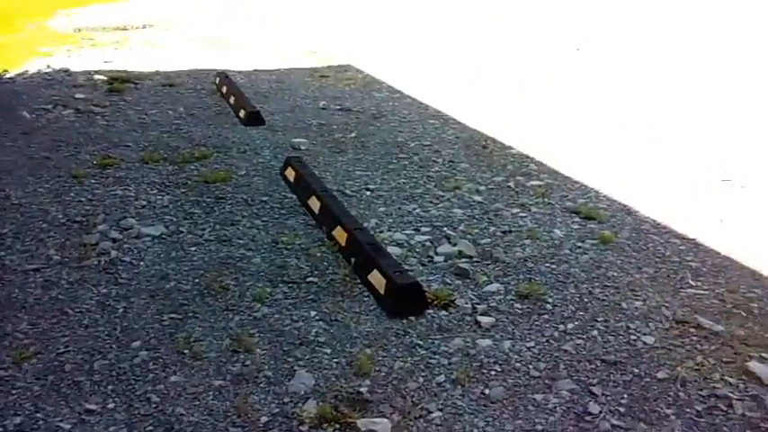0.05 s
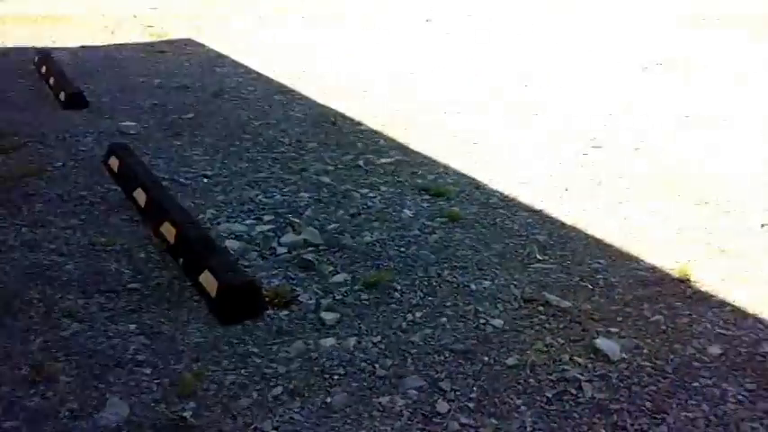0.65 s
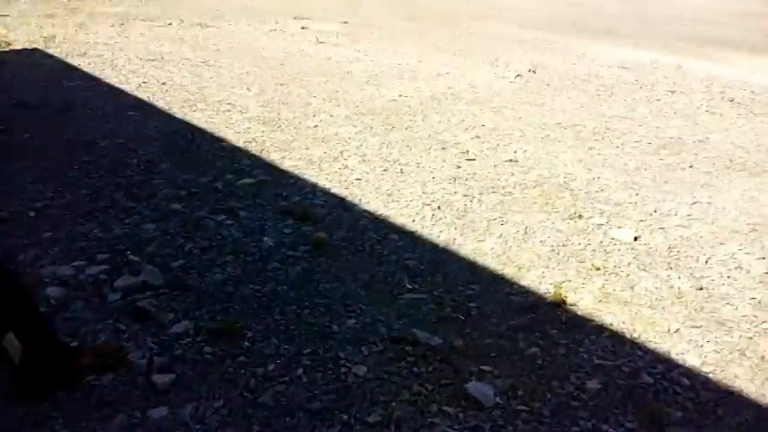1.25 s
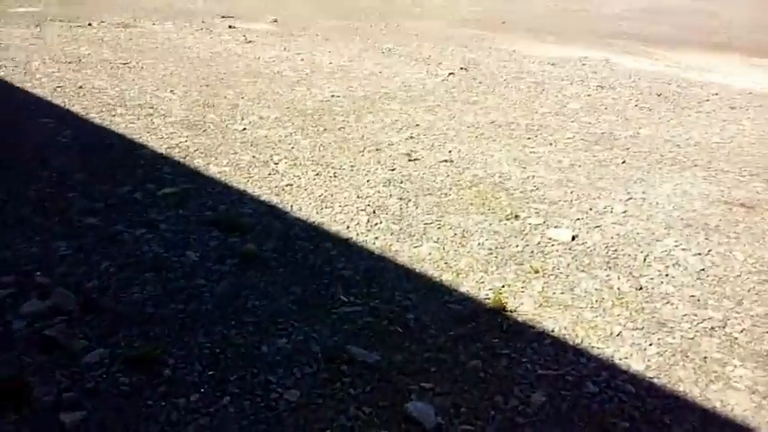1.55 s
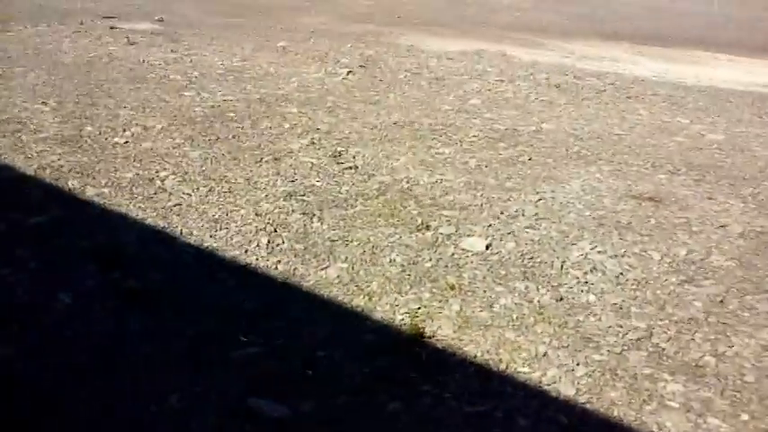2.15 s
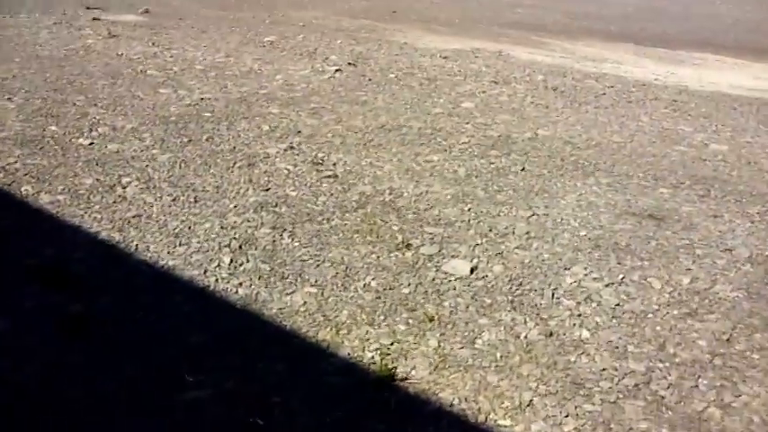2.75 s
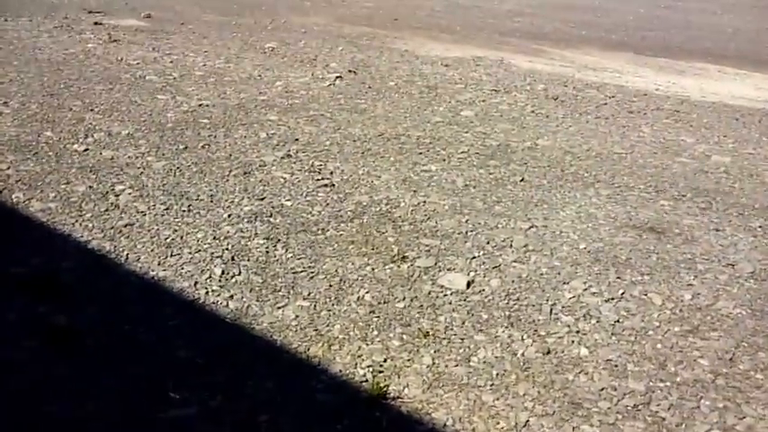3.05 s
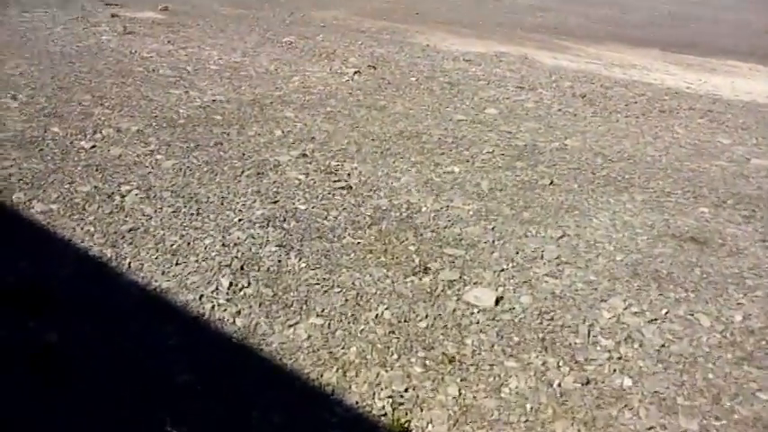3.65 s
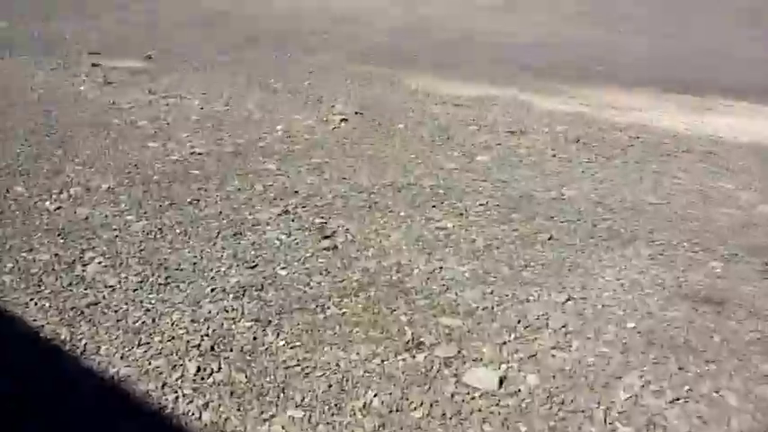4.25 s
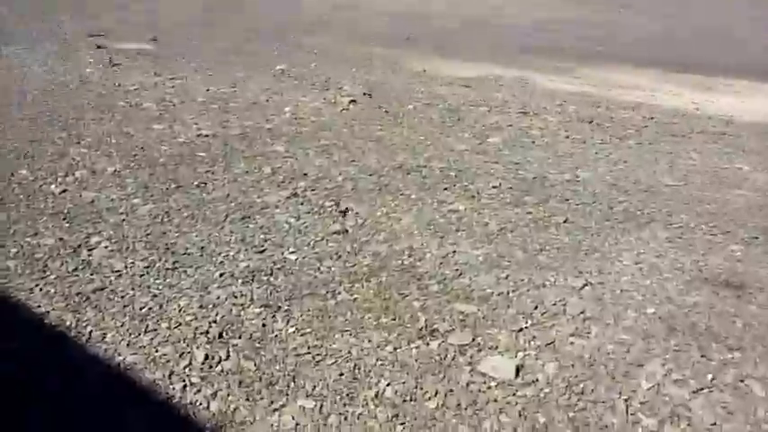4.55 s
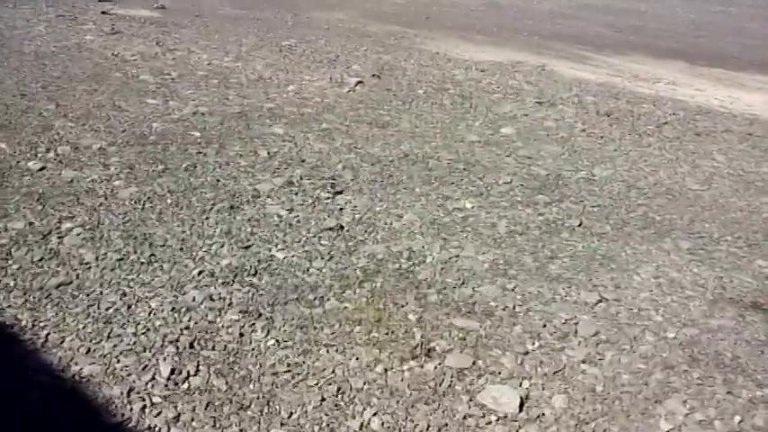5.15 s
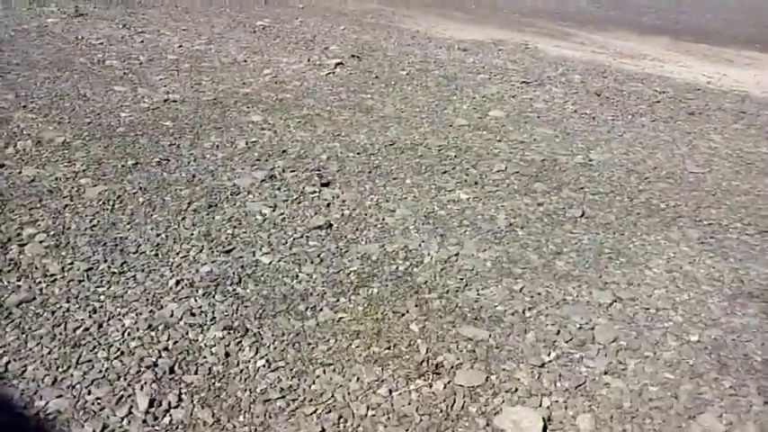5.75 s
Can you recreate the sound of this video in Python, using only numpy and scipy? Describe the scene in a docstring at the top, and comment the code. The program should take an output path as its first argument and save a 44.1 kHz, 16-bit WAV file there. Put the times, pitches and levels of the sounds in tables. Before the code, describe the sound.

Thin, high bird whistles and a rapid trill, with distant calls, small stone clicks and a faint outdoor rumble.

```python
"""Killdeer over a gravel lot, each voice a harmonic tone of the syrinx. Two harsh chips open; plaintive
'dee' whistles and far, wavy 'kill-deer' calls follow, while a shifting foot makes stones ring and crunch.
A near bird then runs from drawn-out pips into a fast trill, and a far trill joins its end. Three more
whistles dip and rise, the last clean and loud over a second far trill. A faint rumble, rustle, hiss
and low hum lie under it all."""
import sys
import numpy as np
from scipy import signal
from scipy.fft import rfft, irfft, next_fast_len
from scipy.io import wavfile
from scipy.ndimage import uniform_filter1d, map_coordinates

SR = 44100
rng = np.random.default_rng(int(sys.argv[2]) if len(sys.argv) > 2 else 0)


def wav_out(sig):
    """Save sig, one row per channel (or a flat mono array), as 16-bit PCM at SR to the path in sys.argv[1]."""
    wavfile.write(sys.argv[1], SR, np.round(np.clip(np.atleast_2d(sig).T, -1, 1) * 32767).astype(np.int16))


N = 255339
TIME = np.arange(N) / SR

# course of the near trill: (time [s], fundamental [Hz], relative level [dB], brightness [dB])
TRILL_COURSE = [(1.9, 1486, -51.5, 2), (2.03, 1475, -50.5, -4), (2.18, 1486, -50.5, -3.5),
                (2.39, 1456, -50.5, -4.5), (2.6, 1481, -52, -2.5), (2.72, 1480, -53, 2.5),
                (2.88, 1452, -55.5, -2.5), (3.07, 1431, -58, 2.5), (3.16, 1435, -51, -2.5),
                (3.29, 1404, -60.5, 2), (3.34, 1433, -59.5, 11)]
# its pace: (time [s], interval between pips [s])
PIP_INTERVALS = [(1.9, .041), (2.1, .0406), (2.3, .0357), (2.44, .0426), (2.85, .0358), (3.07, .0402),
                 (3.18, .0359), (3.35, .0435)]
# pips around the trill: (start [s], length [s], fundamental [Hz], relative level [dB], brightness [dB])
OUTER_PIPS = [(1.637, 0.076, 1408, -52.5, -6.5), (1.758, .055, 1479, -49.5, 0),
              (1.838, .02, 1445, -51.5, -1), (3.431, 0.027, 1489, -51, 8.5),
              (3.509, 0.027, 1472, -50.5, 5.5)]
# pitch arch, scaled in depth for each pip: (share of length [0-1], pitch [ratio])
PIP_ARCH = [(0, .945), (.2, .985), (.42, 1.012), (.65, 1.004), (1, 0.912)]
# a pip's harmonics from the first up: (level [dB], share of brightness [0-1])
PIP_SPECTRUM = [(-16.5, 0.033), (0, .03), (-8, .84), (1, 1), (-12.5, 0.6), (-30, 0.86), (-34.5, 0.76),
                (-42, 1)]
# colour of the trill's echo: (frequency [Hz], relative gain [dB])
WALL_RESPONSE = [(2500, -3), (4400, 0.5), (5900, -3), (7300, 4.5), (10000, -5)]
# 'dee' whistles: (start [s], length [s], time to turn [s], opening pitch [Hz], turning pitch [Hz],
# goal pitch [Hz], waver [Hz], opening level [dB], turning level [dB], closing level [dB], roughness [1])
DEE_CALLS = [(0.03, 0.059, 0.013, 3950, 4290, 4640, 0, -41, -47, -38, 0.3),
             (0.822, 0.19, .066, 4860, 4104, 4820, 75, -41, -60.5, -49.5, 1),
             (3.549, 0.22, 0.062, 4790, 3700, 4313, 164, -40.5, -60, -50, 1.02),
             (4.507, .243, .073, 4870, 3842, 4370, 167, -41, -48, -50.5, 0.9),
             (5.188, 0.223, 0.044, 4480, 3730, 4400, 0, -25, -45.5, -26, 0.17)]
# harsh chips: (centre [s], length [s], fundamental [Hz], level [dB])
CHIP_NOTES = [(0.018, 0.015, 1930, -40.5), (0.076, 0.024, 1932, -42)]
# stone impacts: (time [s], level [dB], ring frequency [Hz], ring T60 [s], crack against ring [dB])
STONE_IMPACTS = [(.312, -46.5, 1238, .04, -9), (.44, -44, 1410, .005, -7), (.579, -51.5, 2020, 0.047, -3),
                 (0.762, -52, 7440, .012, -11), (.8055, -34, 960, 0.024, -16),
                 (1.0572, -23, 1316, .012, -16), (1.0644, -35.5, 1462, 0.019, -14),
                 (1.16, -22, 6660, 0.0059, -4.5), (1.161, -17.5, 5000, 0.0052, -3.5),
                 (1.1614, -16.5, 2700, 0.0024, -12), (1.918, -30.5, 1120, 0.0096, -32),
                 (2.0207, -25.5, 1330, 0.0062, -37), (2.462, -41.5, 480, 0.02, -15),
                 (2.538, -39, 577, 0.021, -27), (2.7397, -25, 4720, 0.0038, -0.5),
                 (3.225, -43.5, 2050, .01, -21), (3.727, -44.5, 520, 0.035, -5.5),
                 (3.8637, -34.5, 920, 0.0095, -16), (3.8649, -36, 297, 0.032, -17),
                 (3.977, -48.5, 2060, 0.022, -11), (4.019, -47, 1830, 0.015, -6),
                 (4.643, -40.5, 480, 0.016, -15), (4.987, -41.5, 316, 0.068, -10),
                 (4.999, -30.5, 920, 0.016, -12), (5.007, -30.5, 1020, 0.0086, -13),
                 (5.008, -37.5, 258, 0.04, -16), (5.038, -32, 1550, 0.0084, -26),
                 (5.057, -34, 1270, 0.0056, -24), (5.066, -39, 1740, 0.013, -7),
                 (5.557, -51.5, 2090, 0.016, -10)]
# spectrum of an impact's crack: (frequency [Hz], relative level [dB])
CRACK_SPECTRUM = [(200, -22.5), (1500, 1.5), (4000, -2), (6500, 9), (8500, -7.5), (15000, -17.5)]
# swells of pressure under a sole: (centre [s], half width [s], level [dB])
SOLE_PRESSES = [(.607, 0.04, -58.5), (.803, 0.046, -52), (1.16, 0.041, -56), (1.362, .023, -59),
                (1.738, 0.05, -56), (2.183, 0.034, -58.5), (2.489, 0.038, -50), (3.733, 0.018, -46),
                (5.005, 0.052, -48.5)]
# grit sliding alone: (centre [s], half width [s], level [dB])
GRIT_SLIDES = [(.581, 0.0057, -65.5), (.658, 0.0099, -67), (.977, .032, -68.5), (2.948, 0.079, -67.5),
               (3.22, .16, -64), (3.813, 0.086, -71.5), (4.197, 0.1, -73.5), (5.3, 0.052, -60)]
# spectrum of sliding grit: (frequency [Hz], relative level [dB])
GRIT_SPECTRUM = [(2000, -9), (4500, -6.5), (6500, 3.5), (8500, -6), (15000, -36)]
# far 'kill-deer' calls: (start [s], length [s], level [dB])
FAR_CALLS = [(.412, 0.12, -47.5), (0.574, 0.11, -49), (0.969, 0.12, -49), (1.131, .108, -46),
             (1.547, .125, -49.5), (1.701, 0.12, -50)]
# contour of such a call: (share of length [0-1], pitch [Hz], relative level [dB])
FAR_CALL_CONTOUR = [(0, 2900, 10), (.05, 3135, -11.5), (.16, 2210, -10), (0.261, 2460, -2.5),
                    (.39, 3200, -8), (0.489, 2585, -7.5), (0.589, 2120, -1), (.76, 2366, -4),
                    (1, 2510, -8.5)]
# far trills: (start [s], end [s], level [dB])
FAR_TRILL_SPANS = [(2.958, 3.39, -54), (4.787, 5.35, -51.5)]
# thin far notes: (start [s], length [s], first pitch [Hz], last pitch [Hz], level [dB])
FAR_GLIDES = [(0, 0.015, 2440, 2410, -40.5), (.027, 0.03, 2890, 2450, -47), (2.227, 0.052, 4620, 3660, -64),
              (4.039, 0.043, 4240, 3860, -63), (4.408, .083, 3740, 3705, -65.5),
              (4.53, 0.0337, 4820, 4190, -48), (4.531, 0.17, 3350, 3300, -62),
              (5.26, .039, 3940, 3860, -47), (5.541, 0.14, 4355, 4230, -67), (5.663, .073, 4283, 4380, -61)]
# spectra of the background noises: (frequency [Hz], relative level [dB])
RUMBLE_SPECTRUM = [(20, -42), (36, -18), (55, -3), (130, 5.5), (280, 2), (600, -3), (1000, -17),
                   (2500, -39.5)]
RUSTLE_SPECTRUM = [(300, -29), (800, 5), (1450, 6.5), (2600, 2), (3400, -12), (6000, -11.5), (9000, -18.5),
                   (15000, -64)]
HISS_SPECTRUM = [(1500, -12), (4000, 5), (6500, 6), (9000, -2), (12000, 4.5), (14000, 0.5), (15800, 1)]
# their slow envelopes: (time [s], relative level [dB])
RUSTLE_ENVELOPE = [(0, -63.5), (.25, -75), (.82, -70), (1, -59.5), (1.5, -72), (1.7, -62.5), (1.92, -61.5),
                   (2.2, -67.5), (3.3, -69.5), (3.92, -69.5), (4.34, -72.5), (4.95, -71.5), (5.12, -63.5),
                   (5.29, -74), (5.56, -69), (5.79, -74.5)]
HISS_ENVELOPE = [(0, -69), (.2, -80), (.6, -83.5), (1.05, -81), (1.21, -76), (1.52, -92), (1.69, -79),
                 (2.2, -83), (2.8, -77), (3.1, -81), (3.75, -79), (4.46, -84), (4.54, -76.5), (4.9, -80.5),
                 (5.35, -72.5), (5.72, -87)]
# partials of the hum: (frequency [Hz], level [dB])
HUM_PARTIALS = [(58, -79), (96, -70)]


def near_trill():
    """Harmonic series: even harmonics lead each arching pip, and effort strengthens the upper ones."""
    out = np.zeros(N)
    plain_db, bright_share = np.transpose(PIP_SPECTRUM)
    odd = np.arange(1, len(plain_db) + 1) % 2
    for start, length, hz, db, bright_db in OUTER_PIPS + trill_pips():
        u = ramp(length)
        arch = uniform_filter1d(np.interp(u, *np.transpose(PIP_ARCH)), size=120) - 1
        depth = min(0.034 / length, 0.75) * (1 + 0.17 * rng.normal())  # long pips are flatter
        harmonics_db = plain_db + bright_db * bright_share + odd * 4 * rng.normal()
        swell = fade(len(u), edge_s=0.0032) * amp(-7 * (2 * u - 0.85) ** 2 + 1.8 * wobble(173, len(u)))
        pitch = hz * (1 + depth * arch + 0.0055 * rng.normal())
        add(out, start, amp(db + 2) * swell * syrinx(pitch, harmonics_db, jitter=0.0067))
    wall_gain = lambda hz: amp(np.interp(hz, *np.transpose(WALL_RESPONSE)) - 10)
    echo = filtered(out, lambda hz: wall_gain(hz) * np.exp(-2j * np.pi * hz * 0.014))  # 14 ms late
    return outdoors(out + echo, scatter_db=-8, t60=0.15, echo_db=-19, delay_s=0.02)


def trill_pips(start=1.897, end=3.395):
    """Pulse train: pips of about 20 ms repeat at a drifting rate, pitch, level and brightness."""
    pips = []
    while start < end:
        length = 0.02 * np.exp(0.073 * rng.normal())
        pips.append((start, length, *curves(TRILL_COURSE, start)))
        start += curves(PIP_INTERVALS, start)[0]
    return pips


def whistles(clean_below=0.3):
    """Direct and reflected paths: a clean whistle comes almost straight, rough ones bounce off the lot."""
    rough = sum(whistle(dee, odd_db=-33, flick=0.081) for dee in DEE_CALLS if dee[-1] >= clean_below)
    clean = sum(whistle(dee, odd_db=-26, flick=0.28) for dee in DEE_CALLS if dee[-1] < clean_below)
    return (outdoors(rough, scatter_db=-6.5, t60=0.098, echo_db=-10.5, delay_s=0.02)
            + outdoors(clean, scatter_db=-27, t60=0.11, echo_db=-30, delay_s=0.035))


def whistle(dee, odd_db, flick):
    """Frequency modulation: a dominant second harmonic glides to a turning point, then wavers upward."""
    start, length, turn_s, open_hz, turn_hz, goal_hz, waver_hz, open_db, turn_db, close_db, rough = dee
    attack_s, release_s, rise_s = 0.0085, 0.013, 0.066
    waver_period_s, waver_decay_s, waver_db_per_hz = 0.062, 0.173, 0.0329
    t = length * ramp(length)
    glide = np.sin(np.pi / 2 * np.minimum(t / turn_s, 1)) ** 2
    after = np.maximum(t - turn_s, 0)
    climb = 1 - np.exp(-after / rise_s)
    waver = -waver_hz * glide ** 4 * np.cos(2 * np.pi * after / waver_period_s)
    waver *= np.exp(-after / waver_decay_s)
    pitch = open_hz + (turn_hz - open_hz) * glide + (goal_hz - turn_hz) * climb + waver
    pitch *= 1 + flick * np.exp(-t / 0.0012)  # the voice drops onto the note
    db = open_db + (turn_db - open_db) * glide + (close_db - turn_db) * (after / (length - turn_s)) ** 0.85
    attack = np.minimum(t / attack_s, 1)
    release = np.sin(np.pi / 2 * np.minimum((length - t) / release_s, 1)) ** 2
    rasp = np.exp(-t / 0.037)
    flutter_db = (3.5 * rough + 0.92 * rasp) * wobble(151, len(t))
    harmonics_db = [odd_db + 1, 0, odd_db, -27, odd_db - 21]
    tone = syrinx(pitch / 2, harmonics_db, jitter=0.0071 * rough + 0.018 * rasp)
    out = np.zeros(N)
    add(out, start, amp(db + waver_db_per_hz * waver + flutter_db) * attack * release * tone)
    return out


def chips():
    """Tone bursts: strong overtones make these brief, sagging notes harsh."""
    out = np.zeros(N)
    for centre, length, hz, db in CHIP_NOTES:
        u = ramp(length)
        tone = syrinx(hz * (1.02 - 0.043 * u), [-16, 1, -5, -20, -22], jitter=0.0092)
        add(out, centre - length / 2, amp(db) * fade(len(u), edge_s=0.0058) * tone)
    return outdoors(out, scatter_db=-16.5, t60=0.21, echo_db=-33, delay_s=0.018)


def syrinx(hz, harmonics_db, jitter):
    """Nearly periodic vibration: a bird's voice holds whole multiples of a trembling fundamental."""
    phase = 2 * np.pi * np.cumsum(hz * (1 + jitter * wobble(598, len(hz)))) / SR
    return sum(amp(db) * np.sin(k * phase) for k, db in enumerate(harmonics_db, 1))


def stones():
    """Damped modes: each impact rings under a dry crack, and the higher modes die sooner."""
    out, t = np.zeros(N), np.arange(SR // 10) / SR
    crack_noise = noise(CRACK_SPECTRUM)
    modes = [(0.62, -23), (1, 2), (1.38, -3), (1.75, -12.5)]  # (frequency [ratio], level [dB])
    for start, db, hz, t60, crack_db in STONE_IMPACTS:
        ring = sum(amp(level - 60 * t * ratio / t60) * np.sin(2 * np.pi * (hz * ratio * t + rng.random()))
                   for ratio, level in modes)
        crack = amp(crack_db - 120 * t / t60) * np.roll(crack_noise, rng.integers(N))[:len(t)]
        impact = ring * (1 - np.exp(-t * hz / 0.13)) + crack * (1 - np.exp(-t / 0.000063))
        # each impact carries little below its ring
        radiation = signal.butter(2, min(hz / 3, 500), "high", fs=SR)
        add(out, start, amp(db) * signal.lfilter(*radiation, impact))
    return outdoors(out, scatter_db=-26, t60=0.05, echo_db=-30, delay_s=0.006)


def gravel(pebble_hz=1000, grit_db=-16.5):
    """Friction as many tiny impacts: under a shifting sole, pebbles resonate dully and grit hisses."""
    swells = lambda rows: sum(amp(db) * np.exp(-((TIME - at) / half) ** 2) for at, half, db in rows)
    pebble = lambda f0: filtered(grains(rate=170), lambda hz: 1 / (1 + 2.5j * (hz / f0 - f0 / (hz + 1))))
    pressure = swells(SOLE_PRESSES)
    pebbles = unit(pebble(pebble_hz / 2) + 0.69 * pebble(pebble_hz) + 0.5 * pebble(pebble_hz * 1.51))
    grinding = filtered(pressure * pebbles, lambda hz: 1 / (1 + (hz / 3600) ** 4))
    grit = coloured(grains(rate=1300), GRIT_SPECTRUM)
    return grinding + (swells(GRIT_SLIDES) + amp(grit_db) * pressure) * grit


def far_birds():
    """Scattering over distance smears wavy calls, slowing trills and thin, flickering notes."""
    out = np.zeros(N)
    for start, length, db in FAR_CALLS:
        u = ramp(length)
        contour_hz, contour_db = curves(FAR_CALL_CONTOUR, u)
        call = syrinx(uniform_filter1d(contour_hz, size=250), [0, -30], jitter=0.029)
        add(out, start, amp(db + contour_db) * fade(len(u), edge_s=0.0077) * call)
    u = ramp(0.0227)
    intervals = np.linspace(0.0397, 0.0445, num=14)
    for start, end, db in FAR_TRILL_SPANS:
        onsets = start + np.cumsum(intervals) - intervals
        for onset in onsets[onsets < end]:
            pitch = (2380 + 450 * np.sin(2.86 * u)) * (1 + 0.013 * rng.normal())
            pip = syrinx(pitch, [0, -30], jitter=0.026)
            add(out, onset, amp(db + rng.normal()) * fade(len(u), edge_s=0.0045) * pip)
    for start, length, first_hz, last_hz, db in FAR_GLIDES:
        u = ramp(length)
        envelope = amp(db + 4 * wobble(69, len(u))) * fade(len(u), edge_s=0.0055)
        add(out, start, envelope * syrinx(first_hz + (last_hz - first_hz) * u, [0], jitter=0.014))
    return outdoors(out, scatter_db=-3.5, t60=0.19, echo_db=-12, delay_s=0.0083)


def outdoors(x, scatter_db, t60, echo_db, delay_s):
    """Multipath propagation: direct sound, decaying scatter from the ground and one echo from a wall."""
    t = np.arange(SR // 2) / SR
    tail = rng.standard_normal(len(t)) * amp(-60 * t / t60) * (1 - np.exp(-t / 0.00083))
    scatter = signal.fftconvolve(x, tail / np.linalg.norm(tail))[:N]
    echo = np.interp(TIME - delay_s, TIME, x, left=0)
    return x + amp(scatter_db) * scatter + amp(echo_db) * echo


def background():
    """Ambient noise floor: a slowly growing rumble, a grainy rustle, a faint hiss and a wavering hum."""
    rustle_db, = curves(RUSTLE_ENVELOPE, TIME)
    hiss_db, = curves(HISS_ENVELOPE, TIME)
    rumble = amp(-64 + 0.72 * TIME + 1.07 * wobble(14)) * patchy(noise(RUMBLE_SPECTRUM), depth_db=3.5)
    texture = noise(RUSTLE_SPECTRUM) + 0.5 * coloured(grains(rate=250), RUSTLE_SPECTRUM)
    rustle = amp(rustle_db + 1.5 + 2.6 * wobble(25)) * patchy(texture, depth_db=4)
    hiss = amp(hiss_db + 5) * noise(HISS_SPECTRUM)
    hum, waver_db = np.zeros(N), 2.2 * wobble(9)
    for hz, db in HUM_PARTIALS:
        phase = 2 * np.pi * np.cumsum(hz + 2.487 * wobble(7)) / SR
        hum += amp(db + waver_db) * np.sqrt(2) * np.sin(phase)
    return rumble + rustle + hiss + hum


def patchy(x, depth_db):
    """Amplitude modulation by band: patches of gain drift over time and frequency, at rms 1."""
    spectrogram = signal.stft(x, nperseg=1024)[2]
    field = uniform_filter1d(rng.standard_normal(spectrogram.shape), size=4, axis=0)
    field = unit(uniform_filter1d(field, size=6, axis=1))
    return unit(signal.istft(spectrogram * amp(depth_db * field), nperseg=1024)[1][:N])


def grains(rate):
    """Shot noise: random impulses of uneven size, on average rate a second."""
    return (rng.random(N) < rate / SR) * rng.standard_normal(N)


def noise(spectrum):
    """Gaussian noise with the given spectrum."""
    return coloured(rng.standard_normal(N), spectrum)


def coloured(x, spectrum):
    """Spectral shaping by (frequency [Hz], level [dB]) points, at rms 1."""
    points_hz, db = np.transpose(spectrum)
    return unit(filtered(x, lambda hz: amp(np.interp(np.log(hz + 1), np.log(points_hz), db))))


def filtered(x, response):
    """Linear filtering: the spectrum is multiplied by a frequency response."""
    size = next_fast_len(len(x) + 8192)
    return irfft(rfft(x, size) * response(np.fft.rfftfreq(size, 1 / SR)), size)[:len(x)]


def wobble(rate, n=N):
    """Random modulation: a smooth curve through rate knots a second."""
    knots = rng.standard_normal(int(n * rate / SR) + 4)
    return map_coordinates(knots, [np.arange(n) * rate / SR], mode="nearest")


def fade(n, edge_s):
    """Windowing: a gate with cosine edges."""
    return signal.windows.tukey(n, min(2 * edge_s * SR / n, 1))


def ramp(length):
    """Normalised time: 0 to 1 over a note."""
    return np.linspace(0, 1, max(int(length * SR), 64))


def curves(rows, at):
    """Linear interpolation of each later column against the first."""
    axis, *columns = np.transpose(rows)
    return [np.interp(at, axis, column) for column in columns]


def add(track, start, sound):
    """Superposition: a sound joins a track at start seconds."""
    i = max(round(start * SR), 0)
    track[i:i + len(sound)] += sound[:max(N - i, 0)]


def amp(db):
    """Decibels as an amplitude ratio."""
    return 10 ** (np.asarray(db) / 20)


def unit(x):
    """Normalisation to rms 1."""
    return x / np.sqrt(np.mean(x ** 2) + 1e-20)


def scene():
    """Superposition: the pressures of all sources sum in one channel."""
    return (near_trill() + chips() + whistles() + far_birds() + stones() + gravel() + background())[None]


def record(dry):
    """Band limiting: an ideal low-pass removes the highest treble."""
    return np.array([filtered(x, lambda hz: hz < 15950) for x in dry])


dry = scene()
out = record(dry)
wav_out(out)
```